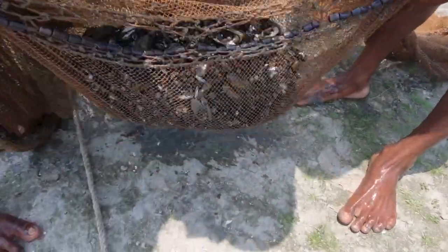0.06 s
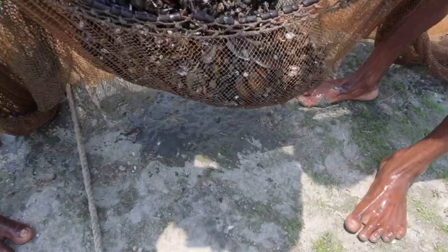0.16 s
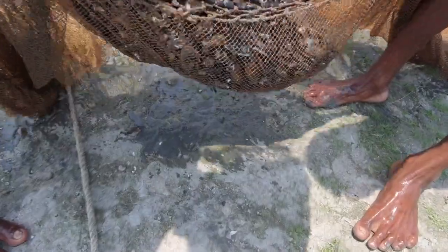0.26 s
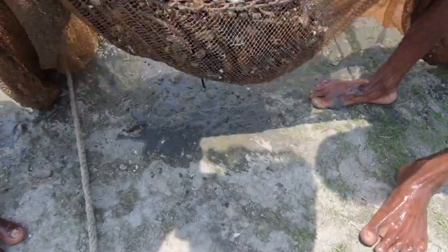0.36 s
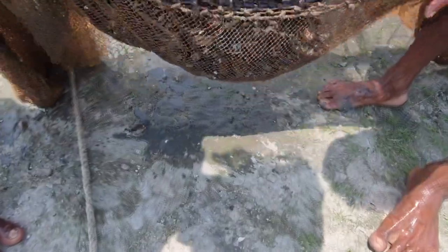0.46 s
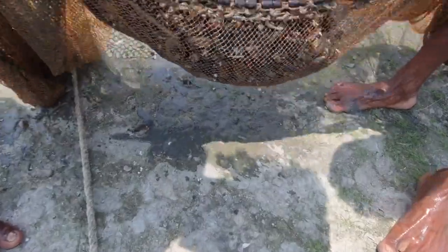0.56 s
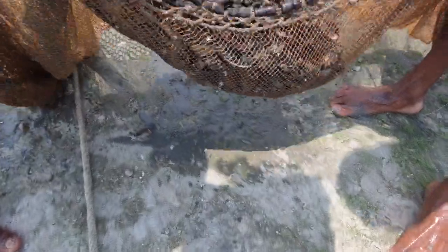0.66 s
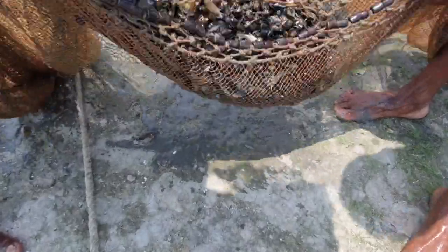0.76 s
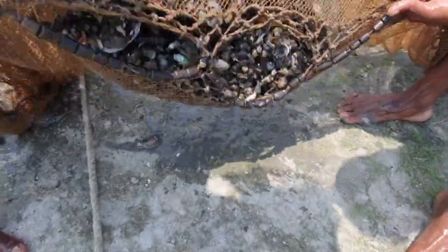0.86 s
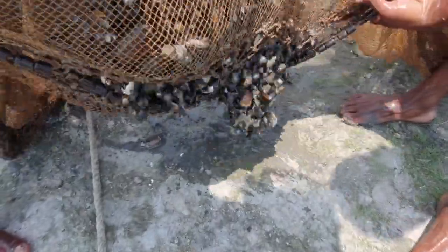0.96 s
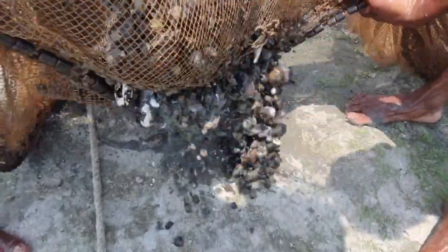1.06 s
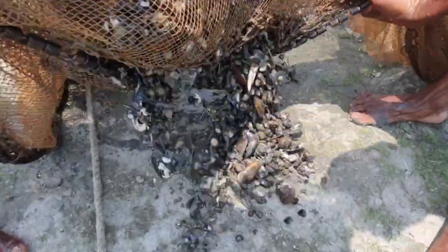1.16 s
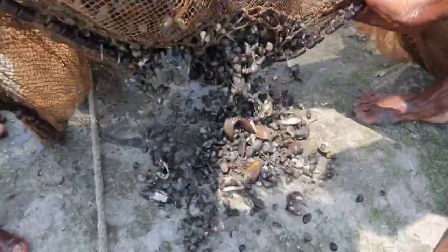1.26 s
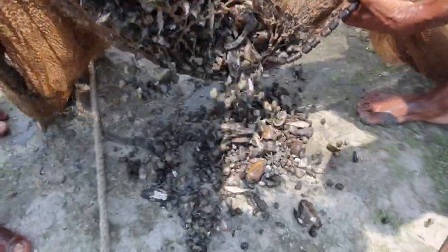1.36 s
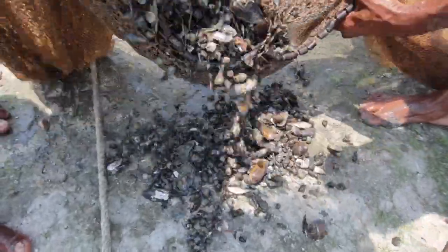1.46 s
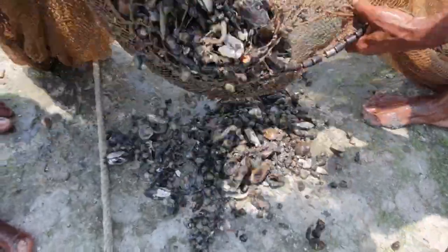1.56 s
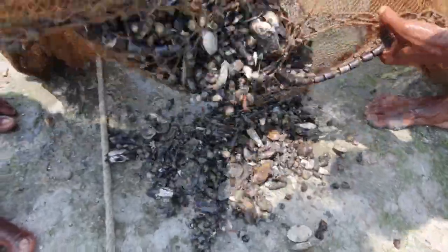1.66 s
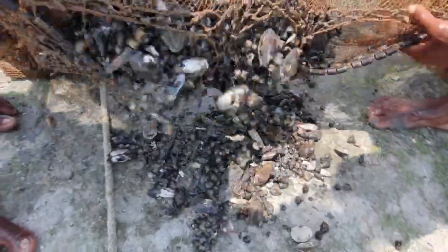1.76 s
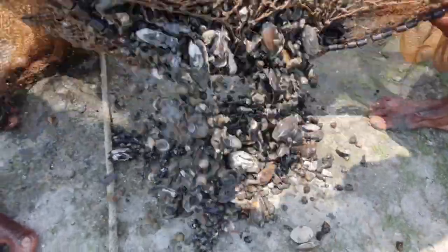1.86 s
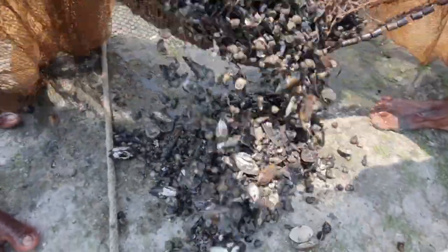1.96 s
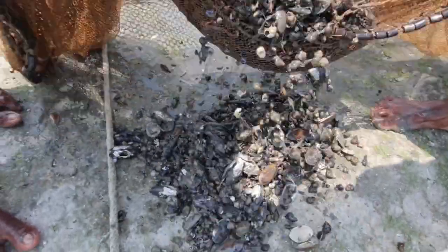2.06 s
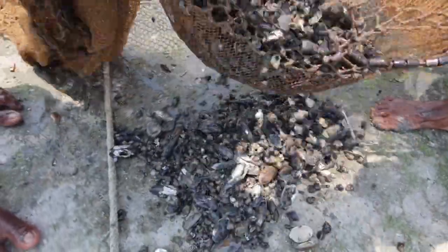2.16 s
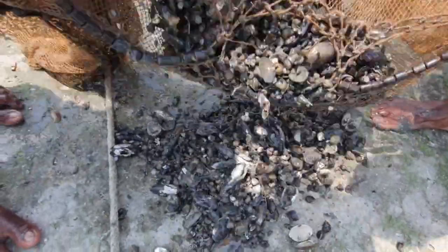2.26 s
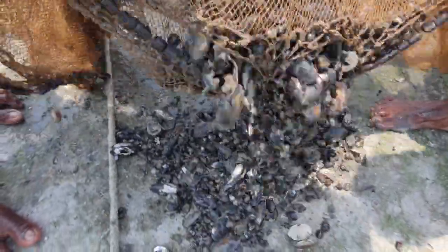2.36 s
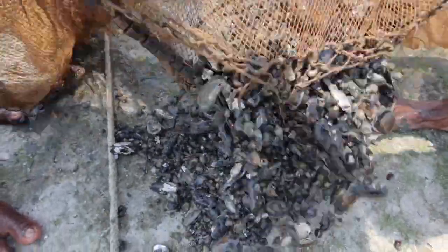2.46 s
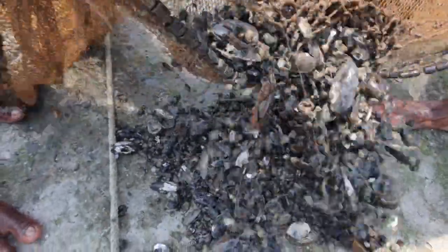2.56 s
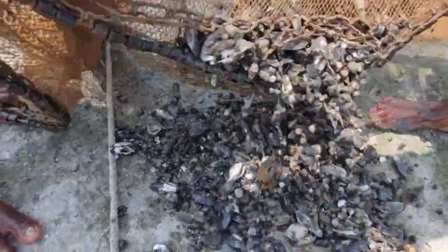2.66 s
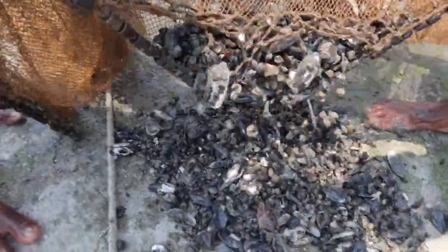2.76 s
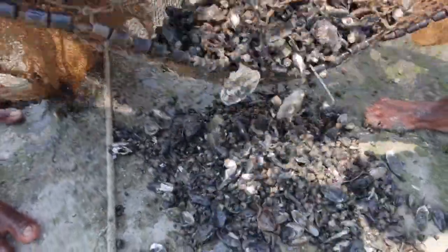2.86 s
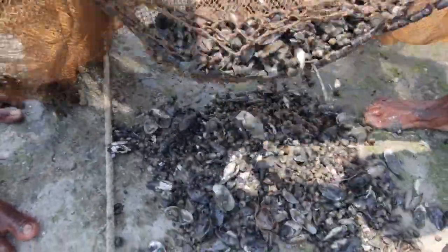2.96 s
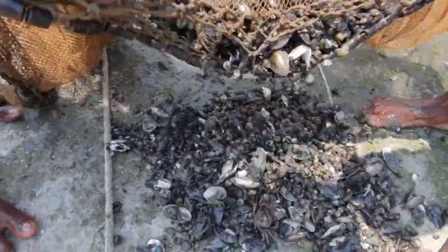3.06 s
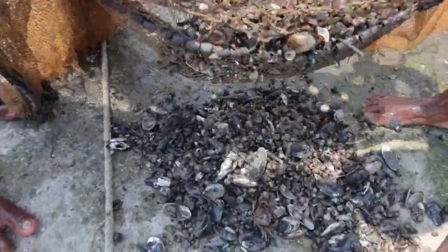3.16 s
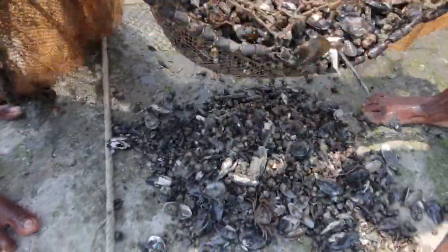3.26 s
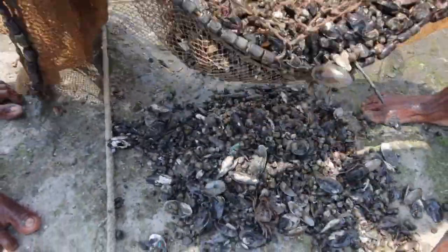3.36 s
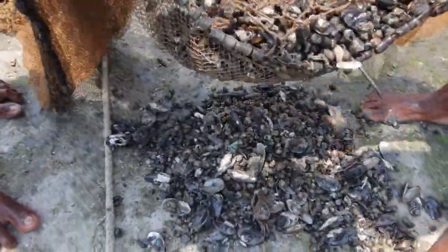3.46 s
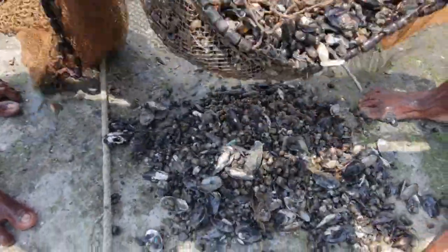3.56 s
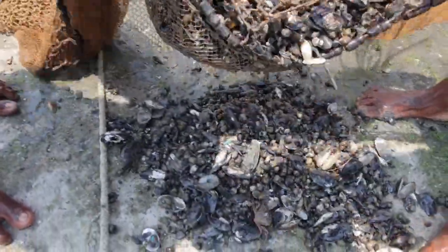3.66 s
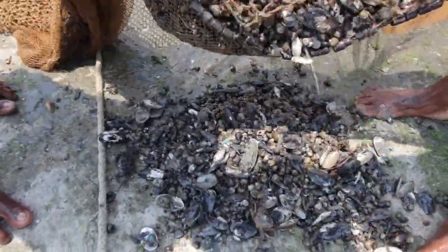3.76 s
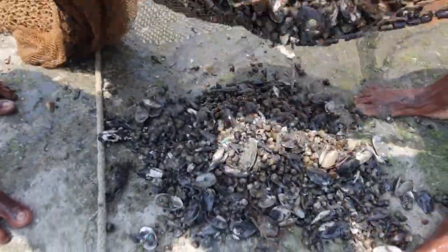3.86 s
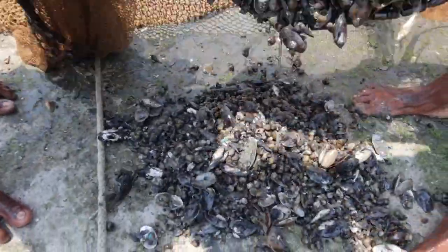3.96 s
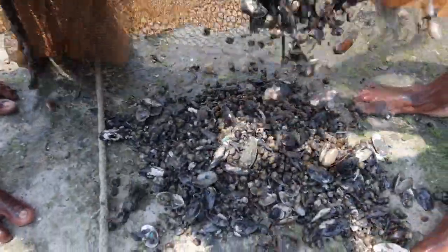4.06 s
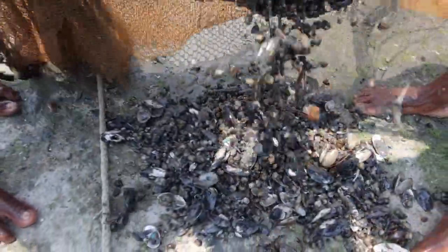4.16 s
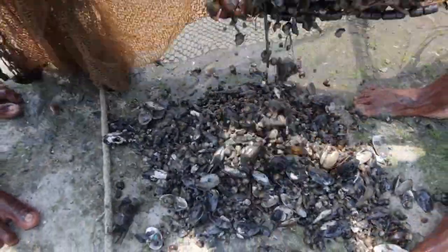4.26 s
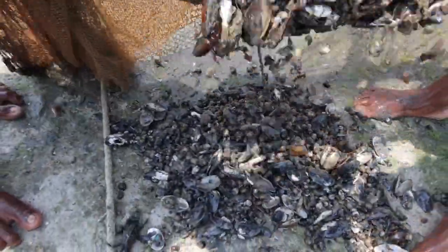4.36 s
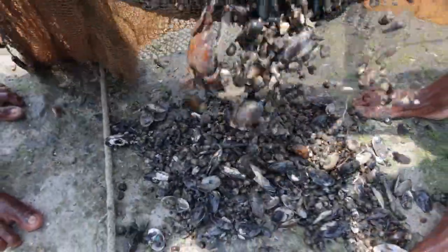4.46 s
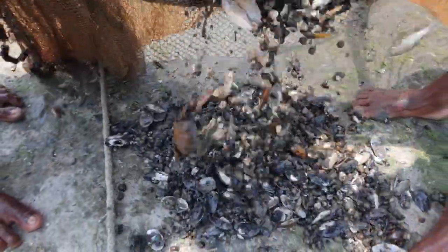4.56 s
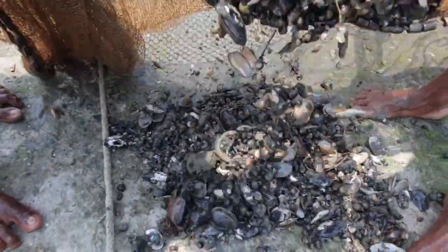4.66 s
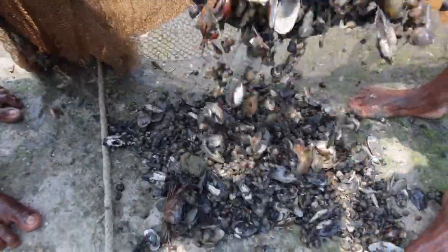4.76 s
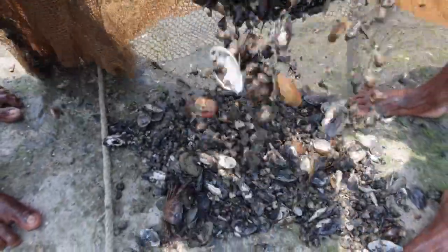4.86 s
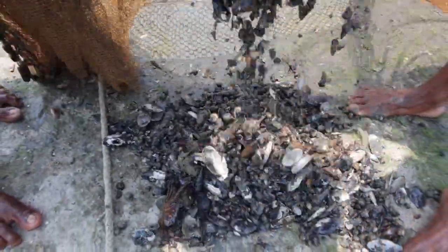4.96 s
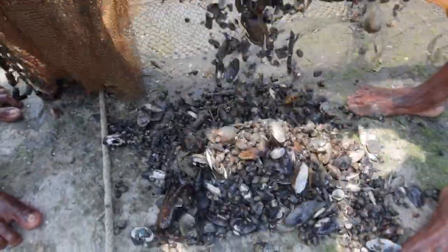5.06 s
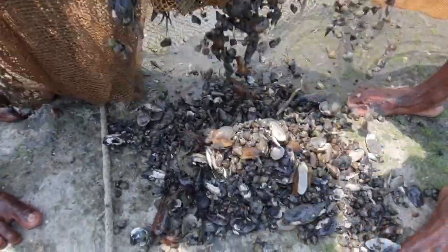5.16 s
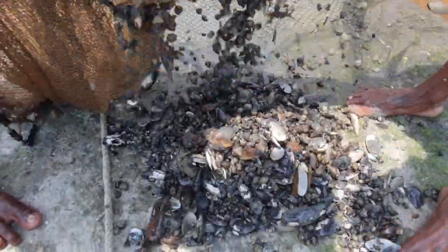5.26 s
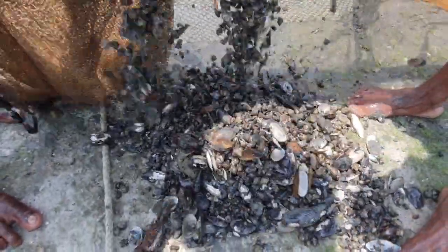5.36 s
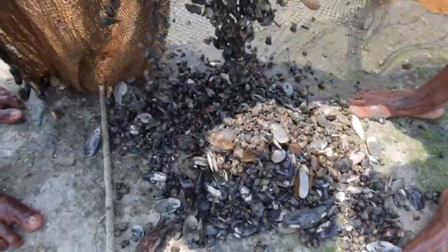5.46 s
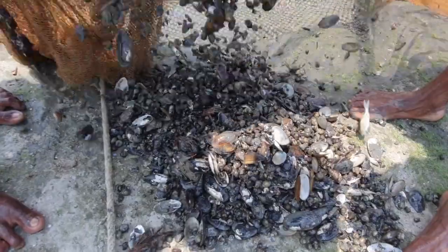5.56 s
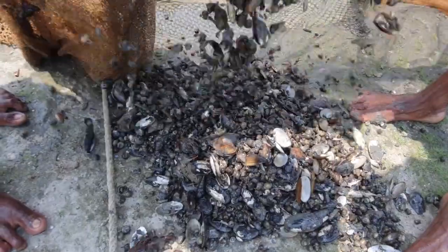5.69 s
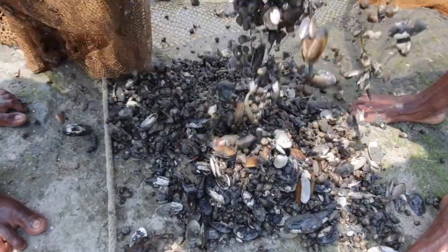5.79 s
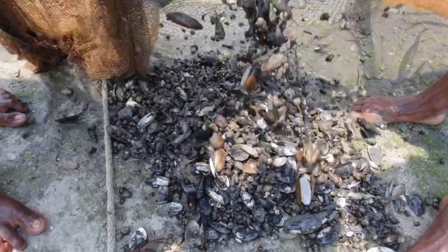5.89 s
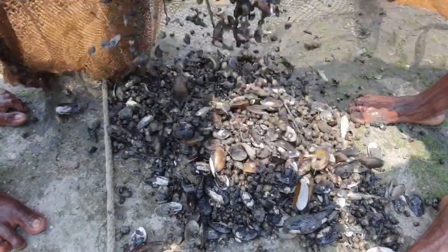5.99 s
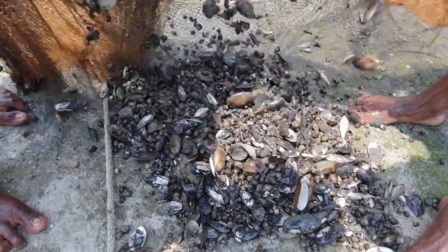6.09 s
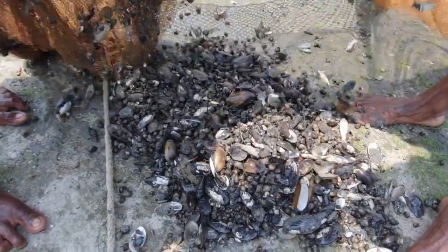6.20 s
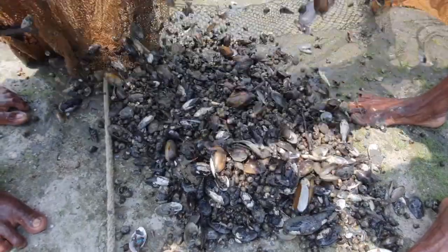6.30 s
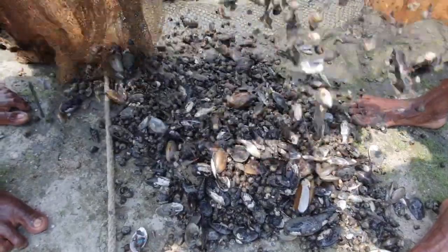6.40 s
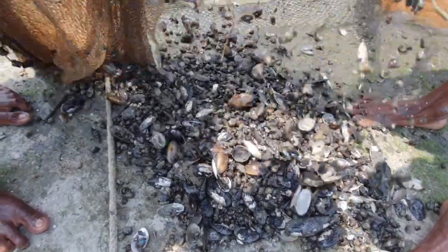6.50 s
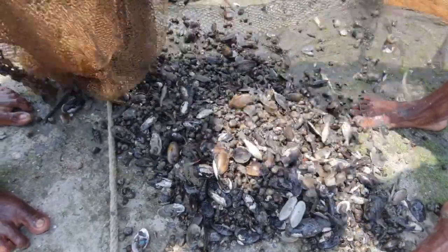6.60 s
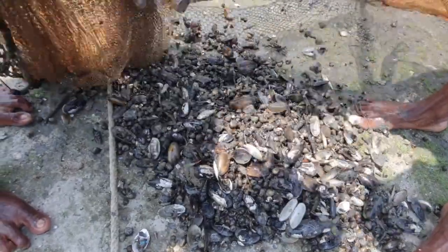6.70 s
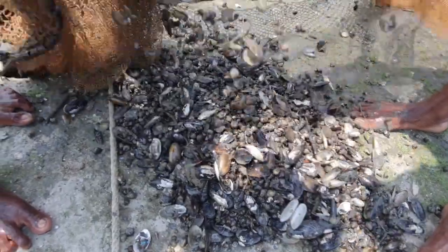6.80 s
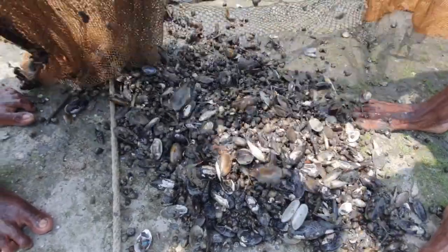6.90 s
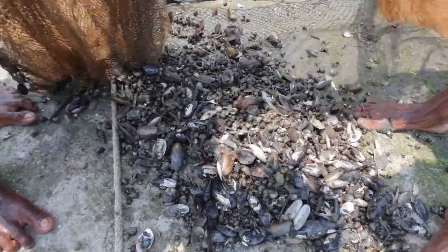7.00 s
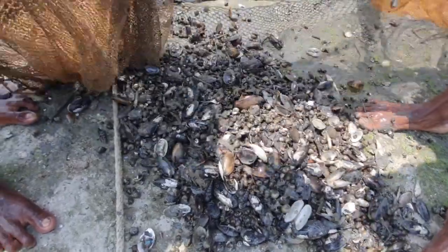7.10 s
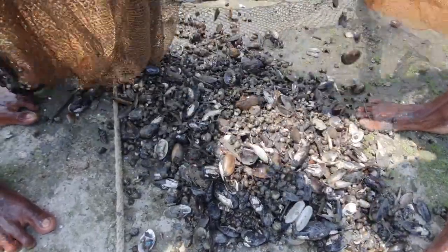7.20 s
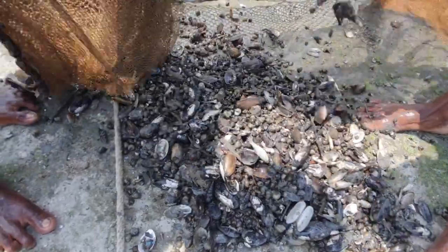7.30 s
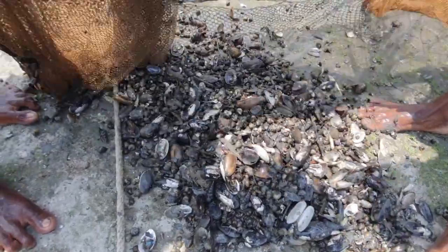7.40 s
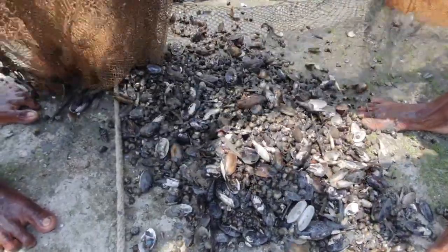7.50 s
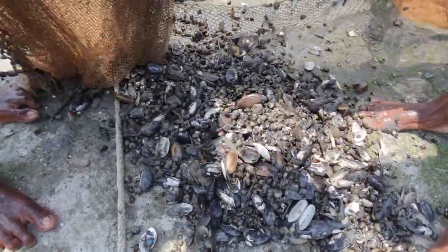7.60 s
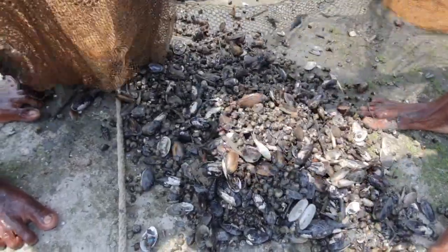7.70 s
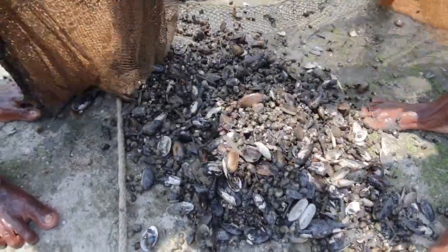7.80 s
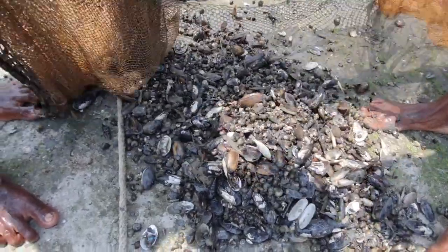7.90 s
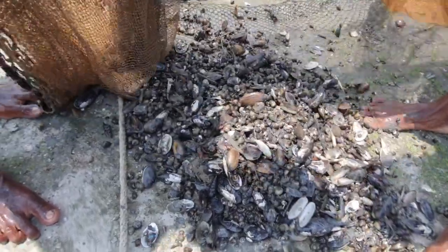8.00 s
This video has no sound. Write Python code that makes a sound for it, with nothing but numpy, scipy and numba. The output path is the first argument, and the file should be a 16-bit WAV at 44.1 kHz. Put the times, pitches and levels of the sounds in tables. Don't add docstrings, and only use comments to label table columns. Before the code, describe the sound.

Close up outdoors, a netful of wet snail and mussel shells is shaken onto hard ground. After a brief rustle, dense rattling bursts pour out, high small clicks over lower clacks and hollow thuds. It lulls to sparse clicks around the middle, then a second, longer spill crashes onto the heap and thins to single shells dropping. Wind flutters and thumps low at the stereo microphone.

```python
import sys
import numpy as np
from scipy import signal
from scipy.fft import rfft, irfft, next_fast_len
from scipy.io import wavfile
from scipy.ndimage import uniform_filter1d, minimum_filter1d, map_coordinates
from numba import njit

SR = 44100
rng = np.random.default_rng(int(sys.argv[2]) if len(sys.argv) > 2 else 0)


def boost_factor(decibels):
    exponent = np.asarray(decibels, float) / 20
    return 10 ** exponent


def master(y):
    cut = np.clip(np.atleast_2d(y).T, -1, 1)
    pcm = np.round(cut * 32767)
    wavfile.write(sys.argv[1], SR, pcm.astype(np.int16))


N = 354563

# time in seconds, flow in dB, share of heavy shells in dB.
SPILL = [(0, -44.5, -7.5), (.3, -31.5, -7.5), (.45, -35.5, -6), (.6, -58, -7), (.73, -61, 0),
         (.95, -28, -11), (1.45, -34, -8.5), (2.65, -28, -6.5), (2.95, -43, -4), (3.66, -47, -10),
         (3.71, -67.5, -3.5), (4.05, -37.5, -2.5), (4.85, -31.5, -14.5), (5.3, -27, -10), (6.2, -24, -14.5),
         (6.35, -36.5, -15), (7.25, -43.5, -17), (8.04, -42.5, -8)]
# peak time in seconds, peak level in dB, build-up in seconds, run-out in seconds.
NET_SHAKES = [(.37, -24.5, 0.061, 0.098), (1.196, -18, 0.18, 0.18), (1.562, -25.5, 0.018, 0.027),
              (1.818, -23, 0.13, 0.056), (2.02, -23, 0.17, 0.31), (2.275, -21, 0.014, 0.15),
              (2.727, -19.5, 0.14, 0.1), (3.008, -30.5, 0.11, 0.024), (3.057, -28.5, 0.0097, 0.0084),
              (3.13, -28, 0.0098, 0.0084), (3.23, -29, 0.037, 0.049), (3.92, -38.5, 0.072, 0.017),
              (4.052, -31.5, 0.031, 0.58), (4.324, -19, 0.032, 0.11), (4.636, -24, 0.023, 0.11),
              (4.675, -22, 0.1, 0.025), (4.799, -25, 0.067, 0.04), (5.048, -23, 0.11, 0.16),
              (5.538, -21.5, 0.28, 0.08), (6.028, -20.5, 0.11, 0.016), (6.437, -23.5, 0.091, 0.0048),
              (6.538, -25.5, 0.12, 0.0045), (6.602, -24.5, 0.015, 0.3), (6.902, -30, 0.023, 0.13),
              (7.01, -24.5, 0.026, 0.021), (7.19, -36, 0.055, 0.029)]
LOAD_EDGE_DB = 11.5
LOAD_HEAVY_DB = -17

# frequency in Hz, level in dB per Hz.
SNAIL_TONE = [(880, -33), (1500, -12.5), (1670, -10.5), (1850, -13), (2470, -4.5), (3290, -2), (4060, 1),
              (5000, -2), (6750, -6), (7750, -5), (10700, -8.5), (13000, -5.5), (15100, -7.5),
              (16200, -7.5)]
# frequency in Hz, level in dB per Hz.
MUSSEL_TONE = [(260, -32), (450, -12.5), (561, -14), (758, 1), (897, -0.5), (1370, 3.5), (2600, 0.5),
               (3380, 0), (5720, -120)]

# time in seconds, strength in dB.
BREEZE = [(0, -38.5), (.7, -45), (1.2, -40.5), (1.85, -36), (2.2, -37), (3.1, -39), (3.6, -36), (4.2, -35),
          (5, -38.5), (5.6, -32), (6.5, -46.5), (7.2, -40.5), (7.7, -32.5), (8.04, -35)]
# peak time in seconds, thump in dB, length in seconds, flutter over thump in dB.
WIND_BUFFETS = [(0.186, -34, 0.059, -5), (0.525, -36, 0.058, -21), (0.79, -37.5, 0.13, -5),
                (1.062, -24.5, 0.048, -4.5), (1.86, -48, 0.034, -13), (2.71, -24.5, 0.028, -9.5),
                (2.83, -34, 0.035, -18), (3.025, -31, 0.03, -18), (3.141, -29, 0.015, 5),
                (3.314, -28.5, 0.051, 3), (3.408, -25.5, 0.071, -1.5), (3.549, -29, 0.097, 4),
                (4.249, -25.5, 0.14, 2), (4.388, -24.5, 0.04, 6), (4.501, -23, 0.047, -9.5),
                (4.77, -27.5, 0.13, -0.5), (4.858, -28.5, 0.086, 8), (5.042, -28, 0.028, -3),
                (5.127, -31, 0.11, 2.5), (5.748, -28.5, 0.1, -7.5), (6.723, -35.5, 0.095, -12.5),
                (6.949, -28.5, 0.11, -4.5), (7.097, -31, 0.023, -31), (7.664, -29, 0.056, -12)]
BUFFET_RISE_DB, BUFFET_FALL_DB = 24, 12
FLUTTER_DB = -1.5
SHELTER_S, SHELTER_DB_PER_S, SHELTER_DB = 4.4, 35.5, 12.5
# frequency in Hz, level in dB per Hz.
THUMP_TONE = [(8.8, -29), (15, -25), (32, -10.5), (81, 3.5), (161, -4), (260, -13), (340, -35), (570, -120)]
# frequency in Hz, level in dB per Hz.
FLUTTER_TONE = [(110, -56), (170, -13.5), (300, 4.5), (450, -3.5), (700, -15), (1200, -23), (2500, -47)]
# frequency in Hz, level in dB per Hz.
AIR_TONE = [(290, -35.5), (500, -36), (622, -31.5), (1020, -18), (1630, 1.5), (4310, 3.5), (6770, 2.5),
            (15100, -4), (16200, -28)]

# start in seconds, peak level in dB.
EDGE_SNAPS = [(0.0398, -34), (0.0862, -35), (0.132, -36), (0.2668, -20), (0.5402, -29), (0.661, -32),
              (0.7607, -28), (0.8031, -36), (0.8579, -36), (0.8944, -27), (1.111, 2), (1.4257, -7),
              (1.492, -2.5), (1.5504, 0), (1.604, -11), (1.6447, -27), (1.659, -25), (1.7004, -9),
              (1.8098, -19), (1.9006, -14), (1.93, -10), (1.9704, -8), (2.2385, -19), (2.274, -13),
              (2.5, -6), (2.6723, -3), (2.826, -14), (2.893, -10), (2.9203, -25), (2.9506, -24),
              (2.9836, -16), (3.0106, -17), (3.0545, -25), (3.1228, -21), (3.1617, -24),
              (3.2276, -30), (3.2789, -15), (3.317, -15), (3.3612, -9), (3.385, -20), (3.4705, -26),
              (3.4897, -9), (3.532, -18), (3.55, -15), (3.609, -18), (3.643, -31), (3.668, -9.5),
              (3.76, -27), (3.8043, -44), (3.8556, -38), (4.0013, -26), (4.0397, -26), (4.1445, -21),
              (4.2023, -14), (4.237, -13), (4.2722, -14), (4.3056, -8), (4.3271, -11),
              (4.5206, -9), (4.552, -11), (4.627, 1), (4.7016, -13), (4.75, -4), (4.7997, -12),
                   (4.892, -7), (4.9244, 1.5), (5.0015, -17), (5.0523, -18), (5.3302, -10), (5.469, 0.5),
                   (5.627, -3), (5.6979, -13), (5.863, -19), (6.0336, -10), (6.351, -2), (6.369, 0.5),
                   (6.53, -2.5), (6.594, -25), (6.754, -14), (6.789, -8), (6.8943, -20), (6.9136, -11),
                   (7.003, -3), (7.0493, -34.5), (7.0902, -24), (7.125, -11), (7.175, -12), (7.2819, -0.5),
                   (7.321, -3), (7.3596, -25), (7.4823, -16), (7.497, 2), (7.5407, -18), (7.611, -14),
                   (7.634, -23), (7.7, -3), (7.724, -8), (7.7955, -23), (7.8282, -9), (7.8543, -9),
                   (7.9084, -25), (7.9373, -13), (7.9545, -6), (7.9957, -31), (8.02, -7.5)]
SNAP_S = 0.008

# start in seconds, peak level in dB, swing in Hz.
EDDY_STRIKES = [(0.178, -27.5, 100.6), (0.506, -23.5, 85), (0.854, -23, 101), (0.939, -29, 75.4),
                (1.049, -19.5, 90), (1.573, -23, 88.8), (1.854, -21.5, 102), (2.081, -37, 83.4),
                (2.555, -26, 76), (2.695, -27, 84), (2.815, -24, 83), (2.922, -33, 110), (3.008, -20, 96),
                (3.301, -28, 122), (3.377, -17, 110), (3.738, -18, 89.5), (3.815, -30, 70.0),
                (3.895, -23, 159), (4.119, -31, 70.0), (4.234, -31, 159), (4.234, -19, 76),
                (4.36, -28, 129), (4.494, -31, 80.7), (4.734, -25, 78.1), (4.878, -24, 75.4),
                (5.025, -28, 85), (5.153, -31, 121), (5.211, -26, 99.6), (5.287, -22.5, 76.4),
                (5.396, -27, 72.7), (5.49, -24, 67.3), (5.635, -22.5, 96), (5.698, -22, 128),
                (5.837, -26, 117), (5.984, -25, 79), (6.088, -31, 135), (6.595, -34, 91.5),
                (6.92, -18.5, 132), (7.072, -19, 80), (7.136, -27, 73), (7.205, -31, 72), (7.31, -23, 64.6),
                (7.42, -30, 91), (7.633, -21, 88.8)]

# start in seconds, peak level in dB, ring in Hz.
SHELL_LANDINGS = [(0.2132, -20, 1260), (0.2684, -12, 3800), (0.538, -24, 5770), (0.561, -25, 1560),
                  (0.6626, -30.5, 7700), (0.7446, -49, 3400), (0.761, -39, 2470), (0.802, -43, 5960),
                  (0.894, -32, 3650), (1.1074, -10, 8300), (1.491, -19, 4770), (1.5516, -12.5, 4270),
                  (1.6045, -10, 5070), (1.663, -15, 4730), (1.9303, -5, 4220), (1.9826, -7, 3900),
                  (2.0302, -12, 2350), (2.1098, -7, 2260), (2.2645, -8, 2120), (2.6646, -13, 1850),
                  (2.8253, -10, 9100),
                  (2.893, -14, 1820), (2.92, -13, 4400), (2.9514, -22, 6300), (2.9714, -19, 4330),
                 (3.0105, -15.5, 6370), (3.0538, -13.5, 3970), (3.1038, -36, 4000), (3.1284, -17, 2160),
                 (3.1611, -31, 4390), (3.277, -18, 3130), (3.319, -14.5, 4470), (3.368, -24, 4490),
                 (3.47, -33, 1230), (3.4907, -21, 2620), (3.531, -21, 3700), (3.551, -26, 7400),
                 (3.607, -17.5, 3770), (3.643, -24, 4460), (3.7358, -39, 4700), (3.761, -30.5, 5300),
                 (3.857, -28, 1810), (4.0227, -24, 1690),
                  (4.0223, -24, 1700), (4.042, -18, 1960), (4.146, -17, 3730), (4.2067, -10, 3280),
                   (4.272, -23, 8200), (4.305, -4, 2700), (4.392, -7.5, 4600), (4.4903, -10, 3440),
                   (4.5186, -11.5, 2200), (4.553, -12, 3170), (4.6301, -6.5, 2580), (4.702, -8, 7850),
                   (4.7514, -6, 3740), (4.7936, -8, 2470), (4.823, -8.5, 3620), (4.893, -15, 7600),
                   (4.925, -11, 7800), (5.0544, -4.5, 5220), (5.3523, -9, 4370), (5.4463, -9, 4730),
                   (5.4697, -11, 7800), (5.549, -4, 4020), (5.658, -9, 2040), (5.81, -13, 2730),
                   (5.86, -11, 5380), (5.8825, -9, 4330), (6.0343, -4, 3670), (6.2248, -8.5, 3680),
                  (6.3502, -17, 4720), (6.3722, -11.5, 2040), (6.4345, -8, 3860), (6.4714, -11, 3900),
                 (6.53, -20, 4350), (6.5916, -6.5, 2720), (6.69, -13, 4840), (6.7712, -12.5, 4280),
                 (6.87, -18, 3780), (6.896, -8, 1560), (6.968, -10, 2820), (7.004, -14, 4100),
                 (7.049, -14.5, 3700), (7.127, -23, 3860),
                  (7.1834, -17, 5300), (7.282, -14, 1540), (7.3205, -16, 4070), (7.3623, -15.5, 3100),
                      (7.3932, -18, 3500), (7.4581, -24, 4440), (7.482, -9, 2320), (7.498, -6.5, 2410),
                      (7.5407, -14, 3620), (7.6167, -16.5, 4140), (7.6342, -14.5, 2460),
                      (7.7016, -11.5, 4330), (7.726, -7, 3110), (7.775, -13.5, 3370), (7.793, -9, 3800),
                      (7.83, -17, 1460), (7.852, -16, 7200), (7.9093, -24, 8000), (7.938, -19.5, 5060),
                      (7.955, -15.5, 9300), (7.995, -15, 2080), (8.0193, -16, 2700),
                  (1.189, -18, 4610), (1.9037, -20, 4080), (1.9917, -11, 2570), (2.6744, -4.5, 2590),
                  (3.2257, -29, 3630), (3.381, -29, 4480), (3.668, -26, 5300), (4.371, -6, 4320),
                  (5.0324, -9, 4700), (5.6965, -11, 1370), (6.1745, -6, 2340), (6.275, -13, 4440),
                  (6.4155, -14, 3900), (7.565, -18, 4000), (7.2915, -21, 8600), (7.419, -19, 3500),
                  (7.511, -13.5, 3840), (1.151, -9, 5200), (1.114, -12, 3800), (1.159, -4, 5530)]
LANDING_DELAY_S = .0012

# start in seconds, peak level in dB, hollow note in Hz.
HEAVY_THUDS = [(0.215, -26, 1260), (1.038, -13, 1380), (1.555, -19, 750), (1.626, -29, 1450),
               (1.781, -16, 980), (1.904, -14.5, 935), (2.044, -19, 880), (2.079, -16, 660),
               (2.193, -15, 1500), (2.224, -10, 1800), (2.257, -12, 1240), (2.393, -15.5, 1080),
               (2.517, -22, 1030), (2.54, -14.5, 1320), (2.699, -6, 1780), (2.891, -18.5, 710),
               (3.055, -20, 770), (3.126, -17, 805), (3.547, -18, 689), (4.089, -21, 1190),
               (4.208, -20, 520), (4.253, -19, 497), (4.286, -16, 505), (4.361, -20, 573),
               (4.442, -22, 565), (4.482, -23.5, 644), (5.021, -11.5, 1340), (5.053, -11, 1670),
               (5.123, -16.5, 770), (5.155, -16, 750), (5.477, -18.5, 746), (5.575, -20, 1480),
               (5.663, -33, 1450), (5.696, -34, 1340), (5.743, -22, 1090), (5.775, -14, 1120),
               (5.884, -12, 1620), (5.971, -9, 1660), (6.046, -33, 1130), (6.077, -19.5, 780),
               (6.105, -22, 730), (6.385, -22, 1620), (6.533, -24, 1420), (6.595, -23, 1260),
               (6.774, -16, 1770), (6.894, -20, 1510), (6.925, -23, 1000), (6.969, -19, 1340),
               (7.291, -40, 1400), (7.484, -23, 1790), (7.667, -30, 1030), (7.723, -7.5, 1860),
               (7.854, -19, 1830), (7.997, -31, 1350)]

# frequency in Hz, extra ease in dB.
EASILY_FADED = [(1750, 1.5), (3000, 3), (4900, 2.6), (6800, 2.9), (8200, 1.5), (10400, 2)]
TOP_HZ = 15950


def unit(x):
    return x / np.sqrt(np.mean(x ** 2) + 1e-20)


def curves(rows):
    s, *cols = np.transpose(rows)
    return [np.interp(np.arange(N) / SR, s, c) for c in cols]


def wobble(rate):
    knots = rng.standard_normal(int(N * rate / SR) + 4)
    return map_coordinates(knots, [np.arange(N) * rate / SR])


def swells(steady_db, s, peak_db, rise_db_per_s, fall_db_per_s):
    t = np.arange(0, N, 32) / SR
    since = t - s[:, None]
    rise_db = -np.abs(rise_db_per_s)[:, None] * since
    fall_db = np.abs(fall_db_per_s)[:, None] * since
    lost_db = np.where(since < 0, rise_db, fall_db)
    power = boost_factor(2 * (peak_db[:, None] - lost_db)).sum(axis=0)
    return 10 * np.log10(boost_factor(2 * steady_db) + np.interp(np.arange(N) / SR, t, power))


def coloured(x, spectrum):
    m = 2 * next_fast_len(N // 2 + 4096)
    hz, db = np.transpose(spectrum)
    log_hz = np.log(np.fft.rfftfreq(m, 1 / SR) + 1)
    gain = boost_factor(np.clip(np.interp(log_hz, np.log(hz + 1), db), -80, 20))
    cep = irfft(np.log(gain), m)
    cep = np.r_[cep[0], 2 * cep[1:m // 2], np.zeros(m // 2)]
    return irfft(rfft(x, m) * np.exp(rfft(cep)), m)[..., :N] / np.sqrt(np.mean(gain ** 2))


@njit
def add(out, start, omega, decay, left, right, lag):
    for k in range(len(start)):
        for side in range(2):
            t0 = start[k] + (0.5 - side) * lag[k]
            first = int(t0) + 1
            gain = left[k] if side == 0 else right[k]
            for n in range(max(first, 0), min(first + int(6 / decay[k]) + 2, out.shape[1])):
                out[side, n] += gain * np.exp(-decay[k] * (n - t0)) * np.sin(omega[k] * (n - t0))


def clinks(s, hz, cycles, size, pan_db, place):
    out = np.zeros((2, N))
    decay = hz / (np.clip(cycles, 1, 60) * SR)
    size = size * np.sqrt(decay * hz / 4000)
    lag = -4.9 + 1.16 * place + 5 * (place > .25)
    left, right = size * boost_factor(pan_db / 2), size * boost_factor(-pan_db / 2)
    add(out, s * SR, 2 * np.pi * hz / SR, decay, left, right, lag)
    return out


def heap(x, t60, db):
    t = np.arange(SR // 25) / SR
    out = np.pad(x, ((0, 0), (0, SR)))
    step = SR // 20
    for n in range(0, N, step):
        tail = rng.standard_normal((2, len(t))) * boost_factor(-60 * t / t60) * (t > .0006)
        smear = signal.fftconvolve(x[:, n:n + step], tail / np.linalg.norm(tail[0]), axes=1)
        out[:, n:n + smear.shape[1]] += boost_factor(db) * smear
    return out[:, :N]


def stream(level_db, lo_hz, hi_hz, cycles, spread_db, clump_db, lives_db, count):
    draw = rng.random((count, 6))
    place = rng.standard_normal((count, 3))
    s = (np.arange(count) + draw[:, 0]) * N / SR / count
    at = (s * SR).astype(int)
    share = np.clip(boost_factor(.5 * (level_db[at] + 28.0)), .2, 1)
    clump = unit(boost_factor(clump_db * (0.74 * wobble(20) + 0.46 * wobble(50) + 0.4 * wobble(130))))
    size = boost_factor(np.clip(-spread_db * np.log(draw[:, 1] + 1e-9), 0, 1.56 * spread_db)) * clump[at]
    size = size / np.sqrt(np.mean(size ** 2) * count / N) * boost_factor(level_db[at]) / np.sqrt(share)
    size = size * (rng.random(count) < share)
    life = np.clip(place[:, 2], -2, 1.7)
    x = np.zeros((2, N))
    for mode in range(3):
        hz = lo_hz * (hi_hz / lo_hz) ** ((mode + draw[:, 2 + mode]) / 3)
        ring_cycles = cycles * (hz / lo_hz) ** 0.047 * boost_factor(lives_db * (2.0 - 0.39 * mode) * life)
        x += clinks(s, hz, ring_cycles, size, 4.0 * place[:, 1], place[:, 0])
    return x


def pour():
    flow_db, heavy_db = curves(SPILL)
    s, db, build, run_out = np.transpose(NET_SHAKES)
    rise, fall = LOAD_EDGE_DB / build, LOAD_EDGE_DB / run_out
    rattle_db = swells(flow_db, s, db, rise, fall)
    clack_db = swells(flow_db + heavy_db, s, db + LOAD_HEAVY_DB, rise, fall)
    small = stream(rattle_db, lo_hz=1496.6, hi_hz=17780, cycles=4.0,
                   spread_db=0.0, clump_db=2.0, lives_db=14.5, count=14000)
    heavy = stream(clack_db + 9.0, lo_hz=458.0, hi_hz=2805, cycles=2.4,
                   spread_db=3.5, clump_db=3.5, lives_db=5.5, count=7000)
    small = boost_factor(0.5) * coloured(heap(small, .028, -6), SNAIL_TONE)
    heavy = boost_factor(-7.0) * coloured(heap(heavy, 0.032, -4.5), MUSSEL_TONE)
    return small + heavy


def wind():
    breeze_db, = curves(BREEZE)
    s, db, length, sharp_db = np.transpose(WIND_BUFFETS)
    rise, fall = BUFFET_RISE_DB / length, BUFFET_FALL_DB / length
    shelter_db = np.clip(SHELTER_DB_PER_S * (np.arange(N) / SR - SHELTER_S), 0, SHELTER_DB)
    thump_db = swells(breeze_db, s, db, rise, fall)
    flutter_db = swells(breeze_db + FLUTTER_DB - shelter_db, s, db + sharp_db, rise, fall)
    lumps_db = 1.3 * wobble(11)

    def eddies(depth_db, rate):
        port_db = depth_db * np.array([wobble(rate), wobble(rate)])
        return boost_factor(lumps_db + port_db) * rng.standard_normal((2, N))

    port_gain = boost_factor([[-.6], [.6]])
    thump = port_gain * boost_factor(thump_db + 3.5) * unit(coloured(eddies(1.34, 23), THUMP_TONE))
    flutter = boost_factor(flutter_db + 2.0) * unit(coloured(eddies(3.7, 55), FLUTTER_TONE))
    return thump + flutter


def air():
    return boost_factor(-50.5 + 2.8 * wobble(1.9)) * unit(coloured(rng.standard_normal((2, N)), AIR_TONE))


def snaps():
    s, db = np.transpose(EDGE_SNAPS)
    draw = rng.random((len(s), 14, 3))
    place = rng.standard_normal((len(s), 2)).repeat(14, axis=0)
    late = draw[..., 0] * (np.arange(14) > 1)
    size = boost_factor(db[:, None] + 1.5 - 7.5 * late - 7.1 * draw[..., 1])
    hz = 6500 * 3.1 ** draw[..., 2]
    when = s[:, None] + 0.000726 + SNAP_S * late
    x = clinks(when.ravel(), hz.ravel(), 2.3, size.ravel(), 1.5 * place[:, 1], place[:, 0])
    return coloured(heap(x, .04, -6), SNAIL_TONE)


def eddy_blows():
    out = np.zeros((2, N + SR))
    for (s, db, hz), side in zip(EDDY_STRIKES, rng.choice([-1, 1], len(EDDY_STRIKES))):
        turn = np.arange(int(2.4 * SR / hz)) * hz / SR
        shape = boost_factor(db + 0.5) * turn * np.exp(1 - turn / 0.87) / 0.56 * (1 - turn / turn[-1])
        phase = side * np.array([[-np.pi / 4], [np.pi / 4]])
        out[:, int(s * SR):][:, :len(turn)] += shape * np.sin(2 * np.pi * turn + phase)
    return out[:, :N]


def landings():
    s, db, hz = np.transpose(SHELL_LANDINGS)
    s = s + LANDING_DELAY_S
    draw = rng.random((len(s), 36, 3))
    place = rng.standard_normal((len(s), 2))
    side, pan_db = place[:, 0], 1.5 * place[:, 1]
    late = (draw[..., 0] ** 1.5 - .09) * (np.arange(36) > 5)
    size = boost_factor(db[:, None] + 3.5 - 4.5 * np.abs(late) - 17.4 * draw[..., 1])
    pitch = 1500 * 12 ** ((np.arange(36) % 6 + draw[..., 2]) / 6)
    when = s[:, None] + .013 * late
    crack = clinks(when.ravel(), pitch.ravel(), 0.99, size.ravel(), pan_db.repeat(36), side.repeat(36))
    crack += clinks(s, 12000 + 0 * s, 1, boost_factor(db + 3), pan_db, side)
    life = .0028 * (3000 / hz) ** .3
    ring = clinks(s, hz, life * hz, boost_factor(db + 14.5) * (4000 / hz) ** 0.54, pan_db, side)
    second_s = s + 0.00195 * draw[:, 1, 0]
    second_hz = hz * (1.115 + .5 * draw[:, 2, 0])
    ring += clinks(second_s, second_hz, life * hz, boost_factor(db + 6.0) * 4000 / hz, pan_db, side)
    return coloured(heap(crack, 0.056, -1.5), SNAIL_TONE) + heap(ring, 0.057, -3.0)


def thuds():
    s, db, hz = np.transpose(HEAVY_THUDS)
    place = rng.standard_normal((len(s), 2))
    size = boost_factor(db + 22.0) * 1000 / hz
    x = clinks(s + .0015, hz, 2.2, size, place[:, 1], place[:, 0])
    x += clinks(s + 0.0014, 0.7 * hz, 1.8, size * boost_factor(-14.5), place[:, 1], place[:, 0])
    x = heap(x, 0.032, -0.57)
    return uniform_filter1d(uniform_filter1d(x, size=7, axis=1), size=7, axis=1)


def scene():
    return pour() + wind() + air() + snaps() + eddy_blows() + landings() + thuds()


def starved(x, under_db, depth_db, uneven_db):
    middle_side = np.array([x[0] + x[1], x[0] - x[1]]) / 2
    hz, _, z = signal.stft(middle_side, SR, nperseg=1024)
    steps = rng.standard_normal((2, len(hz) // 12 + 1, z.shape[2] // 5 + 1))
    steps = steps.repeat(12, 1).repeat(5, 2)[:, :len(hz), :z.shape[2]]
    loud = np.sum(np.abs(z[:, hz > 2000]) ** 2, axis=(0, 1))
    calm = loud < 3 * minimum_filter1d(loud, size=3, origin=1)
    z = z * boost_factor(uneven_db * calm * steps)
    power = np.abs(z) ** 2 + 1e-14
    band = uniform_filter1d(uniform_filter1d(power, size=4, axis=1), size=4, axis=2)
    audible = power * (hz > 600)[:, None]
    masker = uniform_filter1d(uniform_filter1d(audible, size=36, axis=1), size=5, axis=2) + 1e-14
    ease_db = sum(db * np.exp(-((hz - c) / (80 + .04 * c)) ** 2) for c, db in EASILY_FADED)
    margin = under_db - ease_db
    lack = np.clip(-10 * np.log10(np.abs(band / masker)) - margin[:, None], 0, 1)
    lack = lack * calm * ((hz > 1000) & (hz < 15000))[:, None]
    mid, side = signal.istft(z * boost_factor(depth_db * lack), SR, nperseg=1024)[1][:, :N]
    return np.array([mid + side, mid - side])


def band_limit(x):
    return signal.sosfilt(signal.butter(12, 16990, fs=SR, output="sos"), x)


def record(dry):
    x = dry / (1 + np.abs(dry) ** 6) ** (1 / 6)
    x = starved(x, under_db=5.4, depth_db=-28, uneven_db=1.5)
    x = irfft(rfft(x) * (np.fft.rfftfreq(N, 1 / SR) < TOP_HZ), N)
    return band_limit(x)


dry = scene()
out = record(dry)
master(out)
```